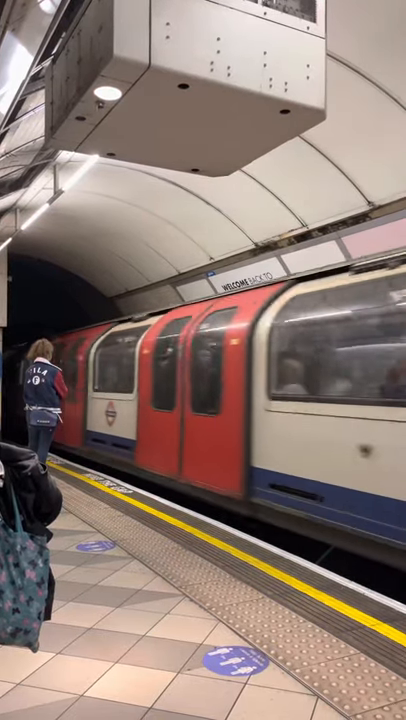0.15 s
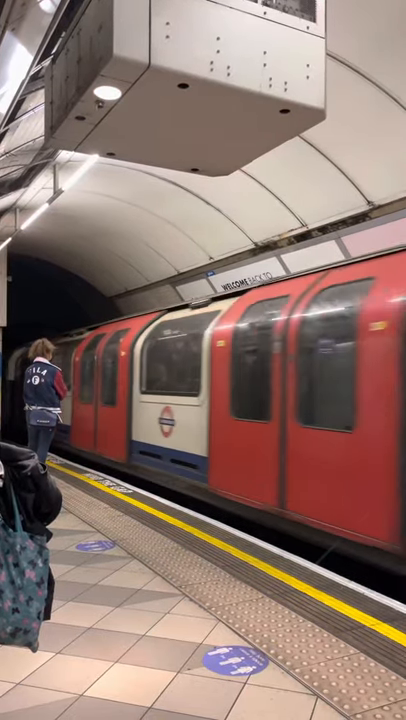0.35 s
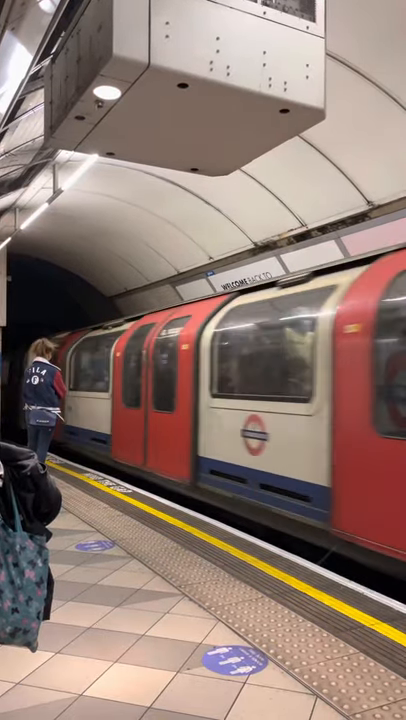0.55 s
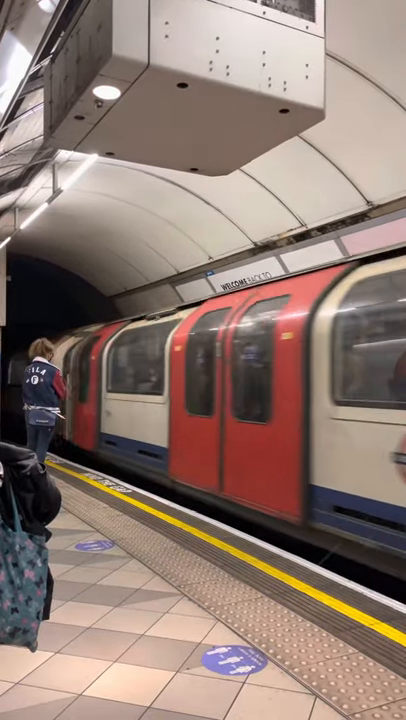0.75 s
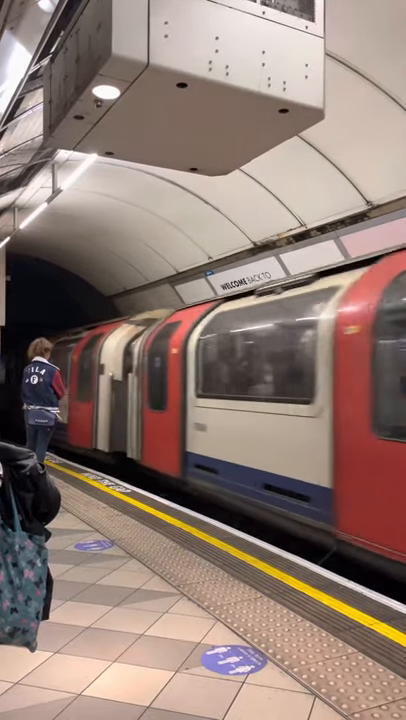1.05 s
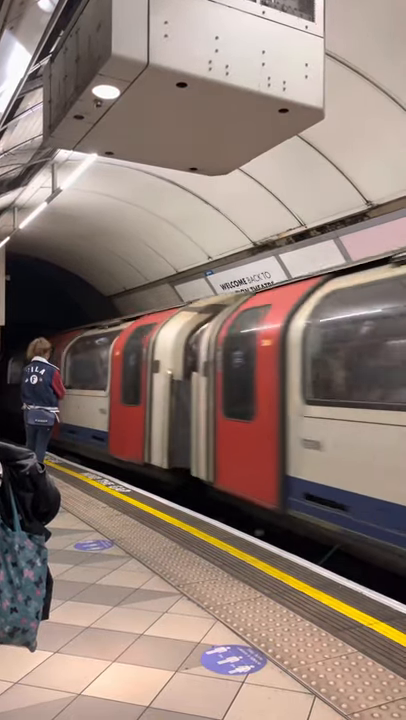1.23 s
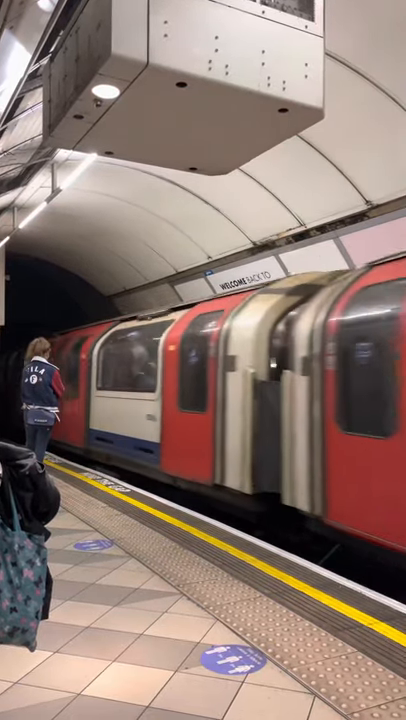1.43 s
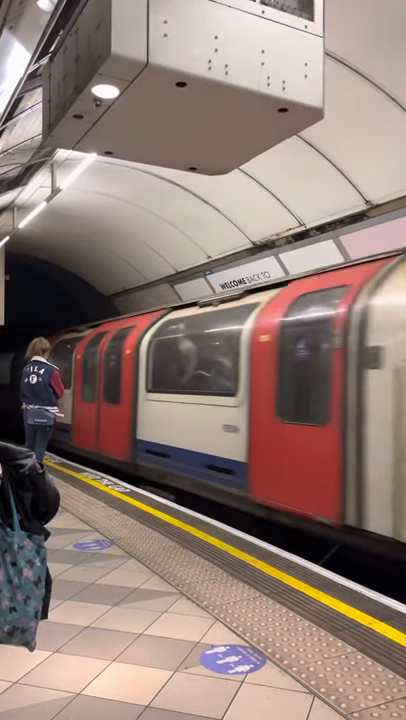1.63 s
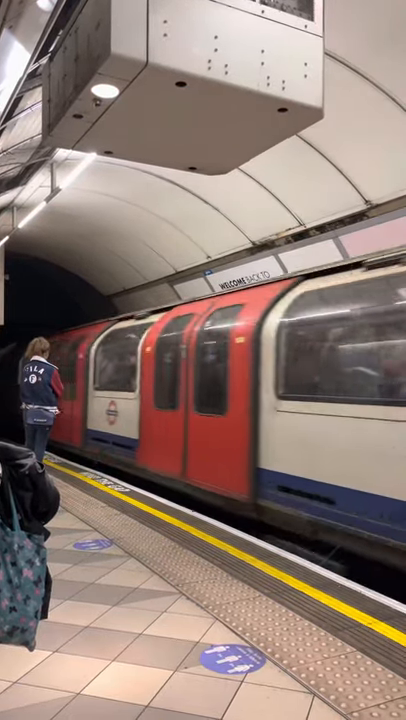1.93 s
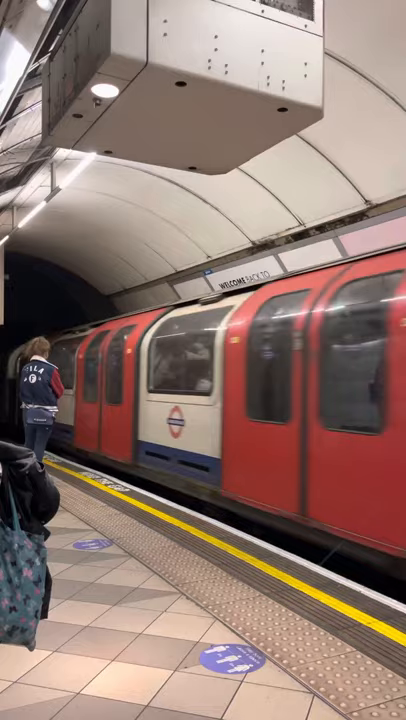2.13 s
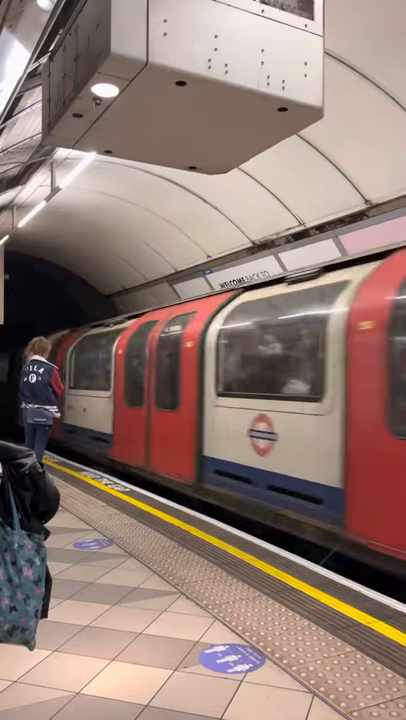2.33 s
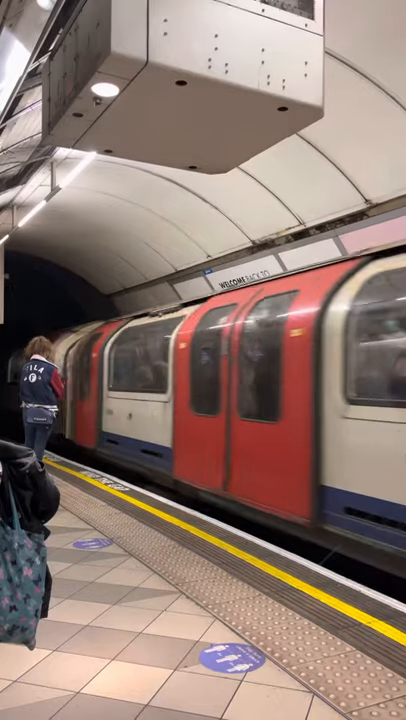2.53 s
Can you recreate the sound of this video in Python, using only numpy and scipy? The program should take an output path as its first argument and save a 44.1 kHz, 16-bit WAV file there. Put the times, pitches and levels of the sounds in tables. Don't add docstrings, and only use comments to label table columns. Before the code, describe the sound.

Subway train passing continuously in a curved tunnel: low track rumble and ringing mid roar swell with each set of wheels, blurred clatters echo, a thin wheel squeal appears late; handheld stereo microphone on the platform.

```python
import sys
import numpy as np
from scipy import signal
from scipy.fft import rfft, irfft, next_fast_len
from scipy.io import wavfile
from scipy.ndimage import uniform_filter1d

SR = 44100
rng = np.random.default_rng(int(sys.argv[2]) if len(sys.argv) > 2 else 0)


def to_wav(sig):
    pcm = np.clip(np.atleast_2d(sig), -1, 1) * 32767
    pcm = np.round(pcm).astype(np.int16)
    wavfile.write(sys.argv[1], SR, pcm.T)


def boost_factor(decibels):
    exponent = np.asarray(decibels, float) / 20
    return 10 ** exponent


N = 118188

# time in seconds, level in dB.
BED_LOAD = [(0.0, -18), (.19, -21.5), (.29, -18.5), (.35, -23), (.41, -17.5), (.62, -19.5), (.77, -26),
            (.83, -19), (1.12, -20), (1.27, -24), (1.37, -15.5), (1.46, -22), (1.6, -19), (1.71, -24),
            (1.79, -19), (2.2, -20.5), (2.51, -27.5), (2.62, -20.5)]
# centre in Hz, width in Hz, level in dB.
BED_MODES = [(47.5, 8, -5), (70, 17.5, 1), (91.7, 22.5, 0), (121.4, 26, -11), (151.5, 21, -3.5),
             (193.2, 48, -8.5)]
# frequency in Hz, level in dB per Hz.
RUSH_SPECTRUM = [(1200, -7.5), (2100, 1.5), (3300, -7), (4100, -8.5), (4900, -11.5), (6200, -12),
                 (9000, -13), (12500, -12)]
# start in seconds, level in dB, brightness in dB per octave.
JOINT_HITS = [(0.0, -29, -5), (0.144, -17.5, 0.77), (.255, -20, -0.45), (.43, -26.5, -1), (.60, -25, -7),
              (.93, -34, 3), (1.149, -31, 2.5), (1.315, -31, 2.15), (1.53, -25, 0.1), (1.89, -24, 1.4),
              (2.02, -22, 1.1), (2.21, -25, 0.45), (2.64, -30, 1.3)]
# frequency in Hz, level in dB per Hz.
CLATTER_SPECTRUM = [(200, -2), (380, -2), (800, -4), (1500, -18), (2500, -21), (4800, -30), (7000, -33.5),
                    (12000, -30.5)]
# time in seconds, nearness in dB, tilt to the high rings in dB.
BOGIE_PASSES = [(0.0, -15, 2), (.13, -17.5, 2.5), (.22, -13, -1), (.35, -17.5, 2), (.59, -17, -0.5),
                (.77, -21.5, 2), (.9, -18, -0.5), (1.05, -18, 7.5), (1.2, -18.5, 3), (1.35, -16, -.6),
                (1.5, -18, 0), (1.75, -17, -0.5), (1.88, -20, 1), (1.96, -14, -4.5), (2.06, -18.5, 0.2),
                (2.35, -17.5, -0.2), (2.51, -21, -0.1), (2.68, -18, -2.5)]
# frequency in Hz, level in dB per Hz.
ROAR_SPECTRUM = [(88, -15), (150, -3.5), (255, -7.5), (377, -0.5), (669, -10.5), (878, -14), (1650, -27.5),
                 (2000, -47), (2600, -61), (4400, -120)]
# centre in Hz, width in Hz, level in dB.
RAIL_MODES = [(300, 50, -4), (385.2, 35, 0), (458.4, 95, -5), (582, 66, -4.5), (872, 186, -15.5)]
# frequency in Hz, level in dB.
DIFFUSE_LEVEL = [(110, -46), (350, -20.5), (720, -6.5), (1600, -13.5), (3000, -3.5), (5000, -4.5),
                 (6000, -8), (9000, -16.5)]
# frequency in Hz, phase in radians.
LEFT_LEAD = [(2000, 0.0), (4050, 1.32), (5500, 5.5), (6100, 6.5), (7500, 8.0), (8400, 9.5), (9600, 9.5),
             (11800, 12.5)]


def rms_one(x):
    return x / np.sqrt(np.mean(x ** 2) + 1e-20)


def in_time(rows, axis=1):
    rows = np.array(rows)
    return np.interp(np.arange(N) / SR, rows[:, 0], rows[:, axis])


def at_hz(points, hz):
    points = np.array(points)
    return np.interp(np.log(hz), np.log(points[:, 0]), points[:, 1])


def drift(rate_hz):
    pole = np.exp(-40 * np.pi * rate_hz / SR)
    noise = rng.standard_normal(N // 20 + 2002)
    slow = signal.lfilter([1], [1, -2 * pole, pole * pole], noise)[2000:]
    return np.interp(np.arange(N) / 20, np.arange(len(slow)), rms_one(slow))


def bands(x, spectrum):
    hz = np.maximum(np.fft.rfftfreq(N, 1 / SR), 1)
    low, high = spectrum[0][0], spectrum[-1][0]
    edge = 1 / np.sqrt((1 + (low / hz) ** 6) * (1 + (hz / high) ** 12))
    shaped = rfft(x) * boost_factor(at_hz(spectrum, hz)) * edge
    for centre in 2 ** np.arange(np.floor(np.log2(low)) - 0.5, np.log2(high) + 1, 0.5):
        window = np.clip(1 - 2 * np.abs(np.log2(hz / centre)), 0, 1)
        yield centre, irfft(shaped * window, N)


def tipped(tilt_db, hz):
    group_hz, octaves = np.array([380, 607]), 0.33
    low, high = np.exp(-(np.log2(hz / group_hz) / octaves) ** 2)
    return tilt_db * (high - low)


def patchy(spectrum, shared_db, own_db, rate_hz, tilt_db=0):
    together = drift(rate_hz)
    out = 0
    for hz, band in bands(rng.standard_normal((2, N)), spectrum):
        swell_db = shared_db * together + own_db * drift(2 * rate_hz)
        out = out + band * boost_factor(swell_db + tipped(tilt_db, hz))
    return rms_one(out)


def resonant(modes, tilt_db=0):
    out = 0
    for hz, width_hz, level_db in modes:
        r = np.exp(-np.pi * width_hz / SR)
        sos = [[1, 0, -1, 1, -2 * r * np.cos(2 * np.pi * hz / SR), r * r]] * 2
        noise = rng.standard_normal((2, N + SR // 2))
        ringing = signal.sosfilt(sos, noise)[:, SR // 2:]
        out = out + boost_factor(level_db + tipped(tilt_db, hz)) * np.sqrt(width_hz) * rms_one(ringing)
    return rms_one(out)


def evened(x, span_s, share):
    power = uniform_filter1d(x[0] ** 2, int(span_s * SR))
    return rms_one(x / (power + 0.05) ** (share / 2))


def track_bed():
    high_pass = signal.butter(4, 36.4, "high", fs=SR, output="sos")
    rumble = signal.sosfilt(high_pass, resonant(BED_MODES))
    return boost_factor(in_time(BED_LOAD) + 3.4) * evened(rumble, span_s=0.061, share=0.68)


def rush(near_db):
    level_db, follows = -34, 0.61
    hiss = patchy(RUSH_SPECTRUM, shared_db=1.0, own_db=1.12, rate_hz=5.2)
    return boost_factor(level_db + follows * (near_db - near_db.mean())) * hiss


def clatter():
    rattles_per_s, rise_s, burst_t60_s = 12000, 0.049, 0.38
    tail_db, tail_t60_s = -7, 2.8
    rattles = (rng.random((2, N)) < rattles_per_s / SR) * rng.standard_normal((2, N))
    parts = list(bands(rattles, CLATTER_SPECTRUM))
    scale = np.std(sum(band for _, band in parts))
    t = np.arange(0, N, 32) / SR
    out = 0
    for hz, band in parts:
        power = 0
        for start_s, level_db, bright_db in JOINT_HITS:
            since = np.maximum(t - start_s, 0)
            rise = np.minimum(since / rise_s, 1)
            fall = np.maximum(since - rise_s, 0)
            burst = boost_factor(-60 * fall / burst_t60_s)
            tail = boost_factor(tail_db - 60 * fall * (hz / 1000) ** 0.31 / tail_t60_s)
            hit = boost_factor(level_db + bright_db * np.log2(hz / 500))
            power = power + (hit * rise * (burst + tail)) ** 2
        out = out + band * np.interp(np.arange(N) / SR, t, np.sqrt(power))
    return out / scale


def squeal():
    start_s, rise_s, hold_s, t60_s = 2.003, 0.092, 0.12, 0.74
    rim_hz, width_hz, level_db, overtone_db = 4020, 220, -33, -13
    since = np.arange(N) / SR - start_s
    fall = np.maximum(since - rise_s - hold_s, 0)
    envelope = np.clip(since / rise_s, 0, 1) * boost_factor(-60 * fall / t60_s)
    overtone = boost_factor(overtone_db) * envelope * resonant([(2 * rim_hz, width_hz, 0)])
    ring = evened(resonant([(rim_hz, width_hz, 0)]), span_s=0.036, share=0.62)
    return boost_factor(level_db) * envelope * (ring + overtone)


def rolling(near_db):
    tilt_db = in_time(BOGIE_PASSES, axis=2)
    roar = patchy(ROAR_SPECTRUM, shared_db=0.58, own_db=0.76, rate_hz=3, tilt_db=tilt_db)
    rings = boost_factor(-4.5) * resonant(RAIL_MODES, tilt_db)
    return boost_factor(near_db - 0.82) * (roar + rings)


def ports(paths):
    cut_hz, cut_db_per_khz = 11010, -11
    left_gain_db, dip_db, dip_hz = -0.14, -2.5, 328
    pad = 2048
    size = next_fast_len(N + 2 * pad)
    hz = np.maximum(np.fft.rfftfreq(size, 1 / SR), 1)
    roll_db = cut_db_per_khz * np.maximum(hz - cut_hz, 0) / 1000
    padded = np.pad(paths, [(0, 0), (pad, pad)], "reflect", reflect_type="odd")
    direct, diffuse = rfft(padded, size)
    direct = direct * boost_factor(roll_db)
    diffuse = diffuse * boost_factor(at_hz(DIFFUSE_LEVEL, hz) + roll_db)
    turn = np.exp(0.5j * at_hz(LEFT_LEAD, hz))
    dip = boost_factor(0.5 * (left_gain_db + dip_db * np.exp(-(np.log2(hz / dip_hz) / 0.33) ** 2)))
    left = (direct + diffuse) * turn * dip
    right = (direct - diffuse) / turn / dip
    return irfft(np.array([left, right]), size)[:, pad:pad + N]


def scene():
    near_db = in_time(BOGIE_PASSES)
    train = track_bed() + rush(near_db) + clatter() + squeal() + rolling(near_db)
    return ports(train)


def band_limit(x):
    return signal.sosfilt(signal.butter(12, 12880, fs=SR, output="sos"), x)


def record(dry):
    ceiling = 1.56
    mix = ceiling * np.tanh(dry / ceiling)
    return band_limit(mix)


dry = scene()
out = record(dry)
to_wav(out)
```